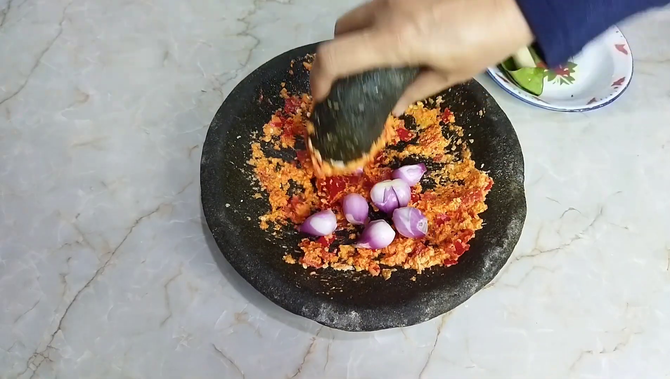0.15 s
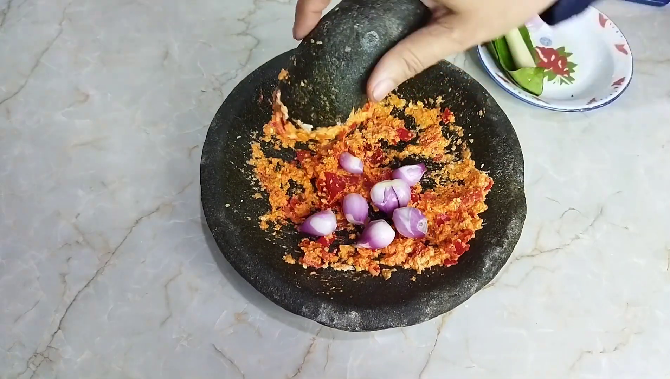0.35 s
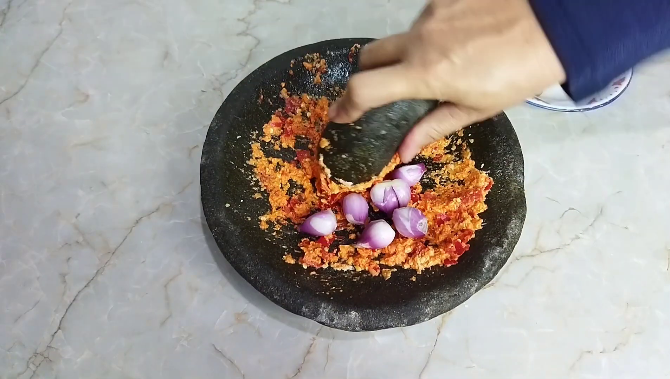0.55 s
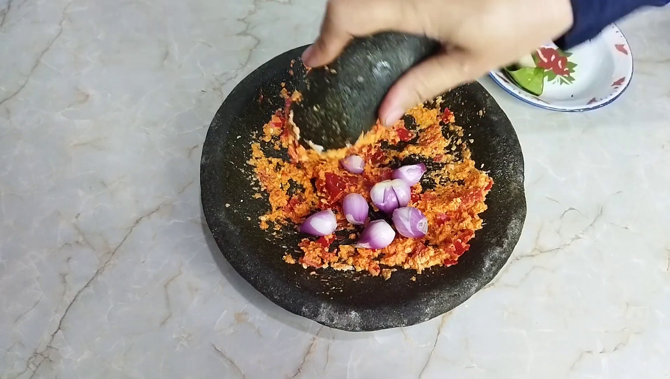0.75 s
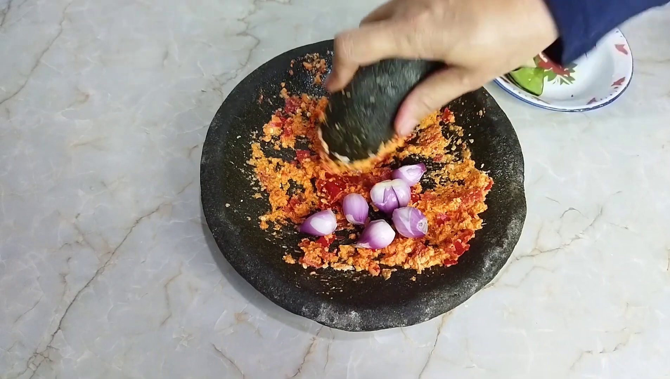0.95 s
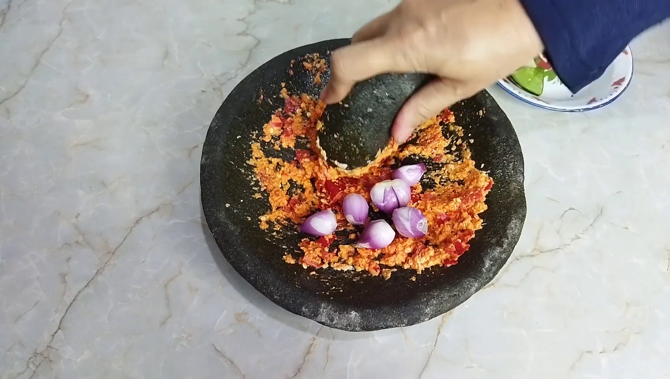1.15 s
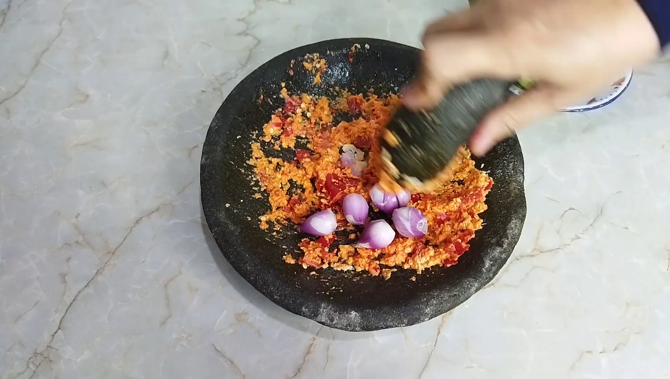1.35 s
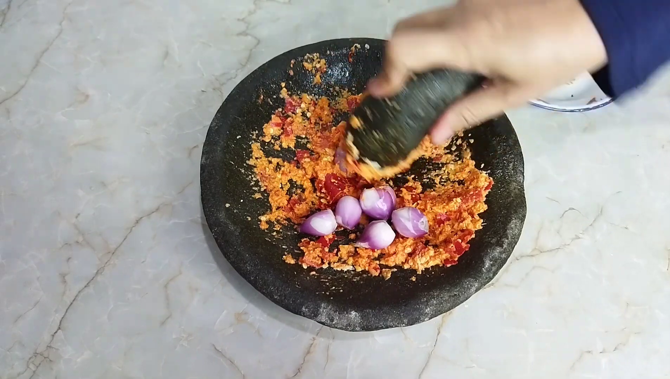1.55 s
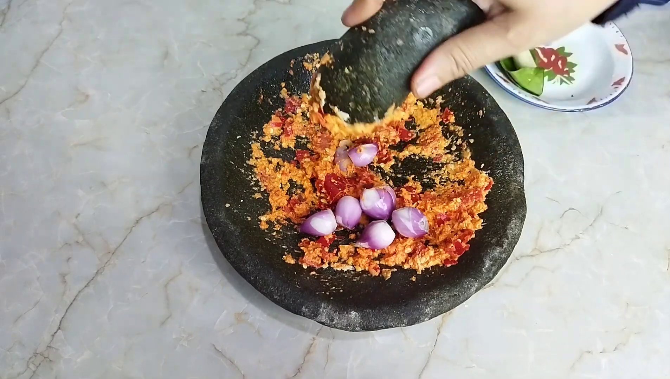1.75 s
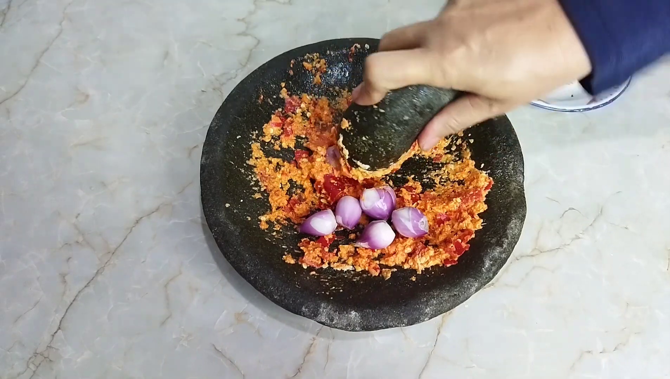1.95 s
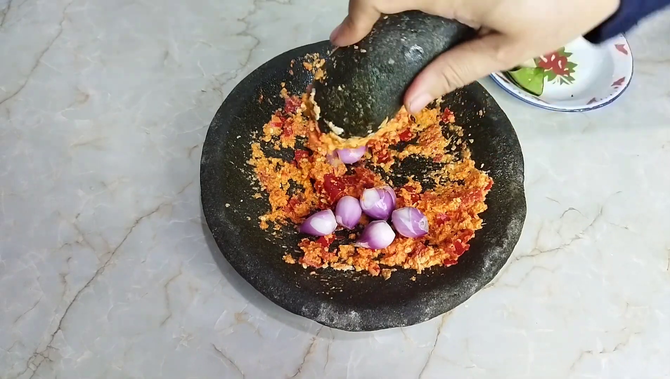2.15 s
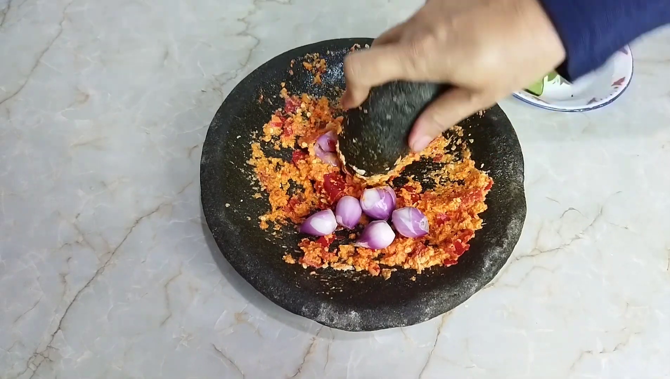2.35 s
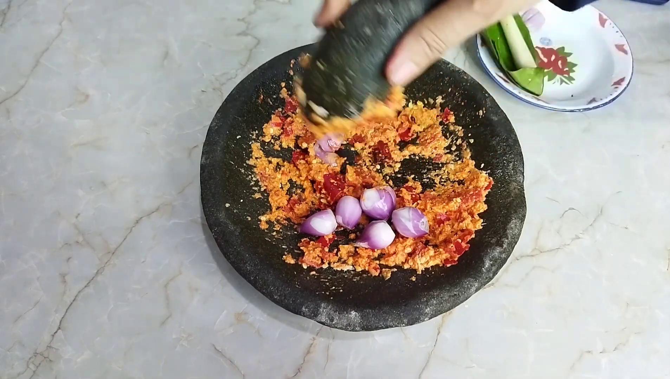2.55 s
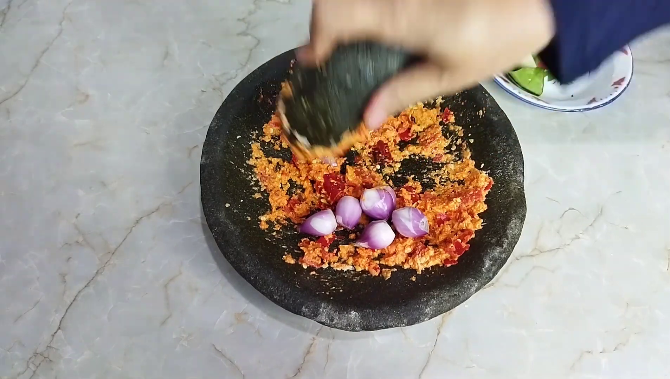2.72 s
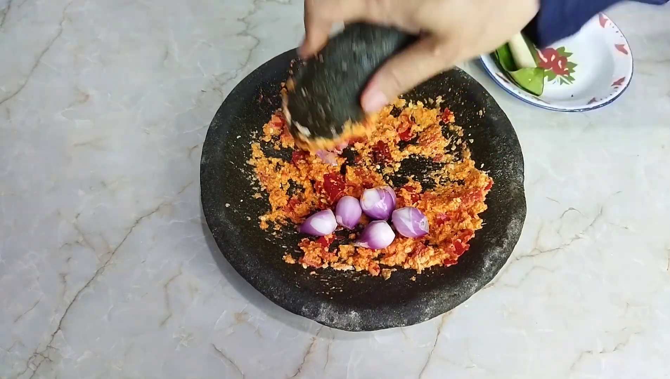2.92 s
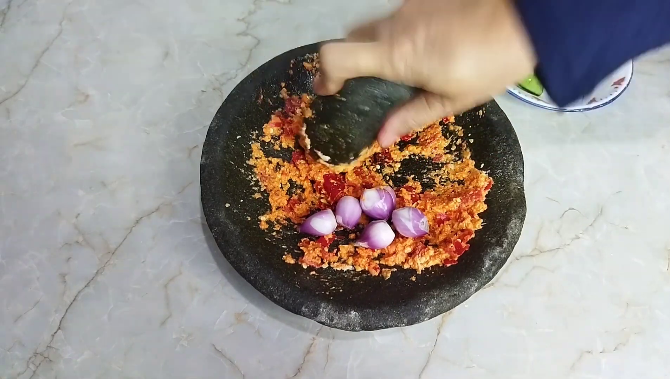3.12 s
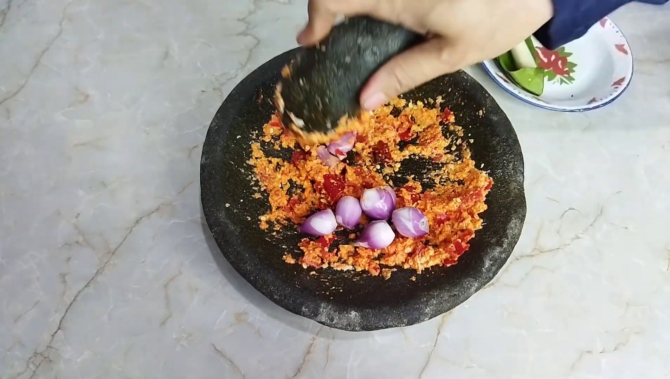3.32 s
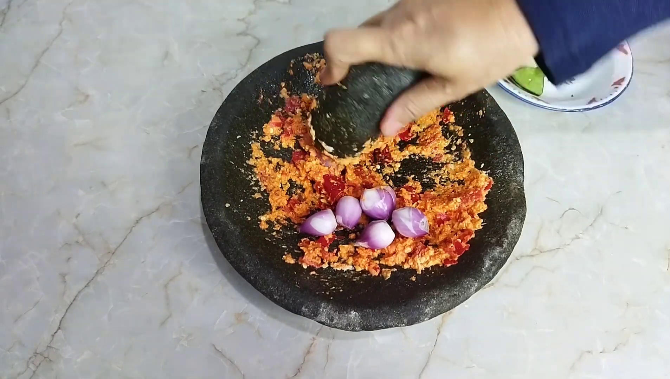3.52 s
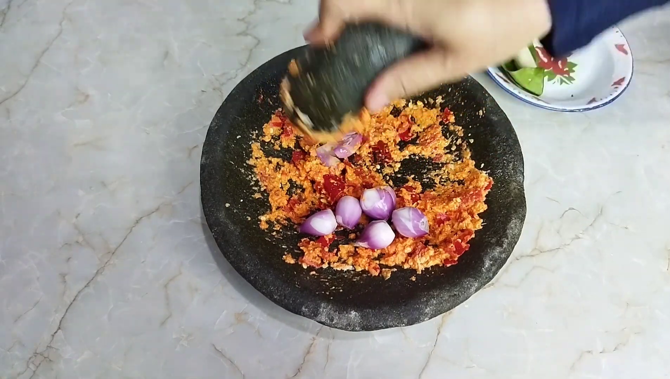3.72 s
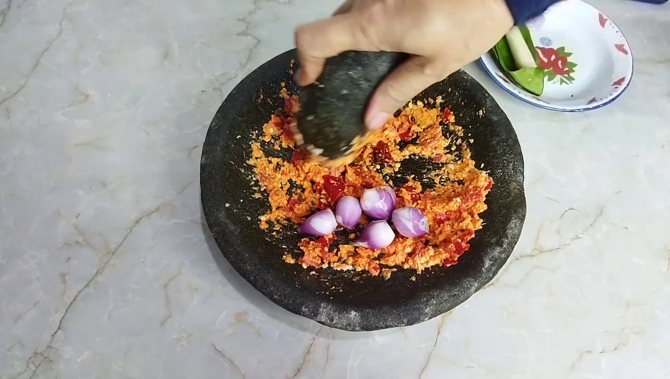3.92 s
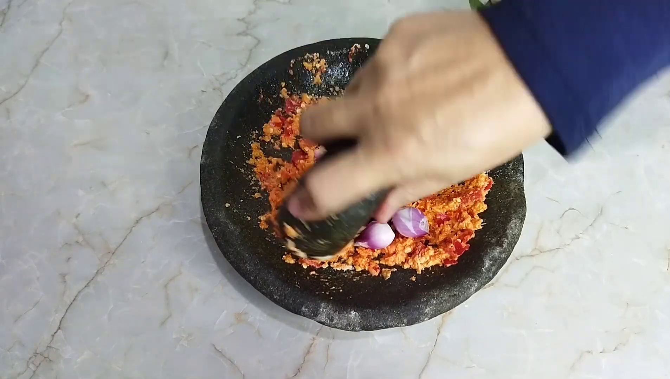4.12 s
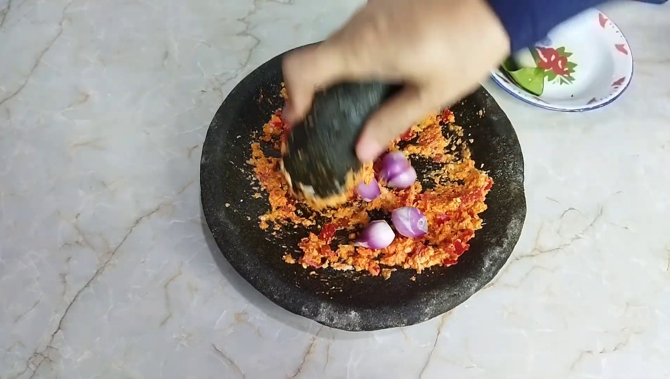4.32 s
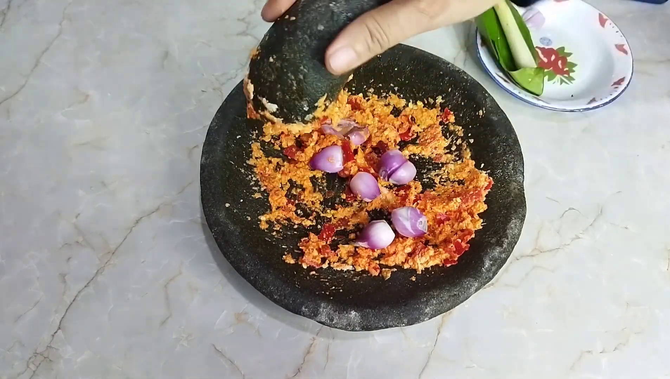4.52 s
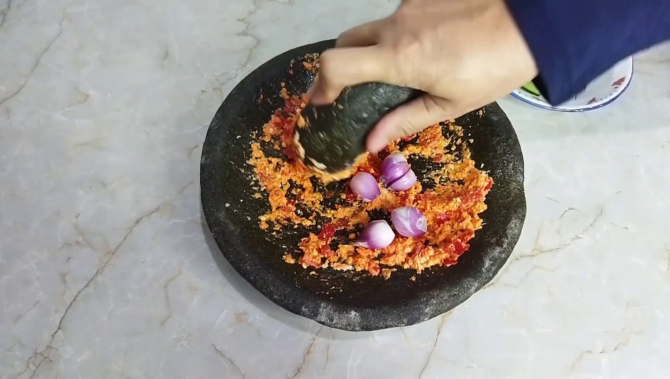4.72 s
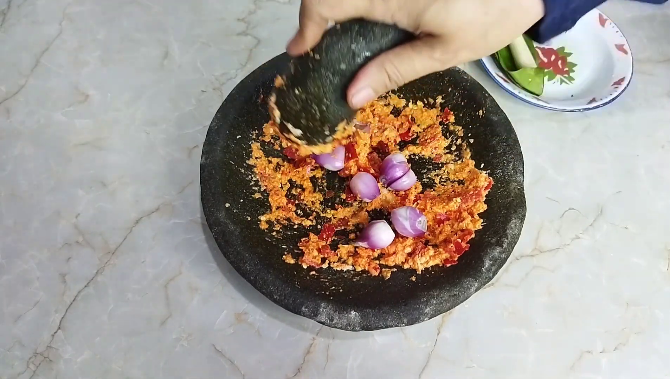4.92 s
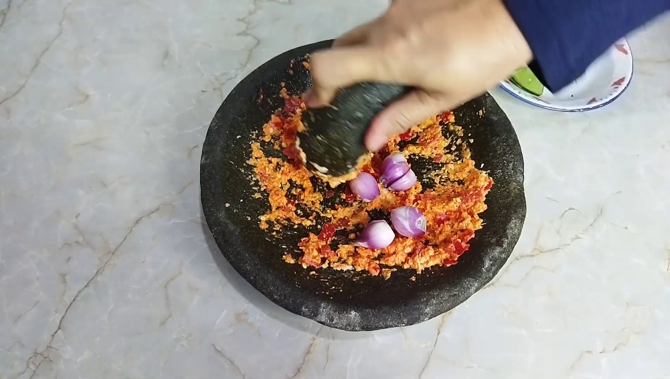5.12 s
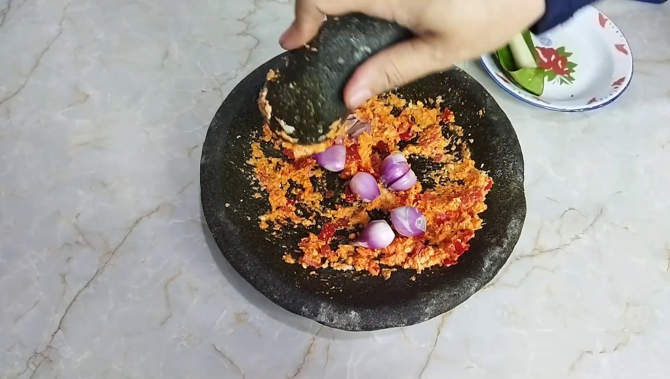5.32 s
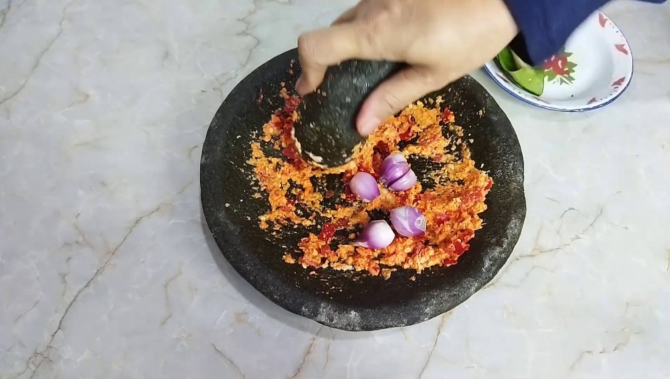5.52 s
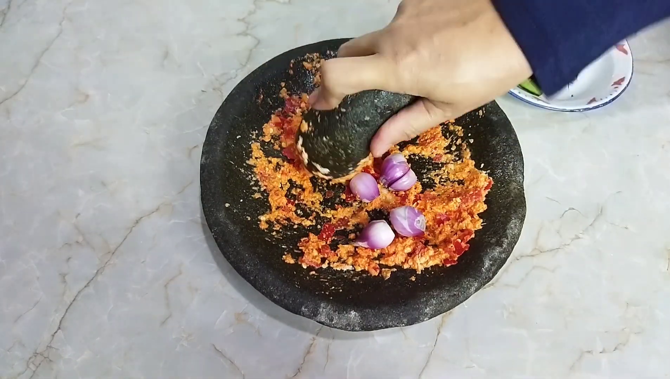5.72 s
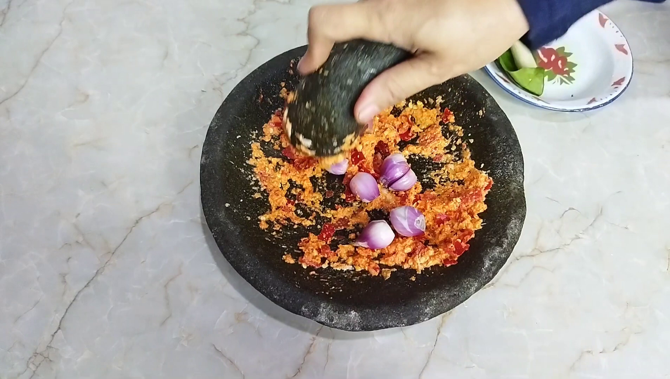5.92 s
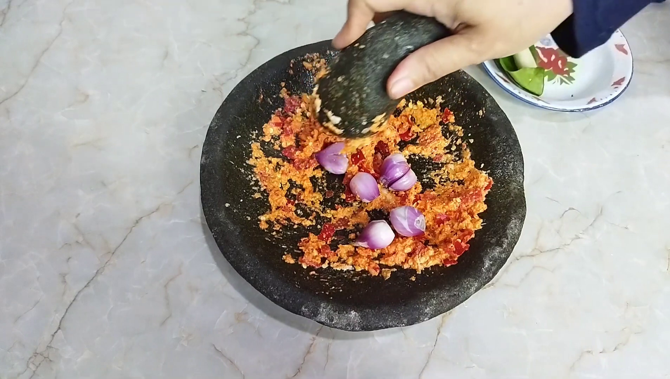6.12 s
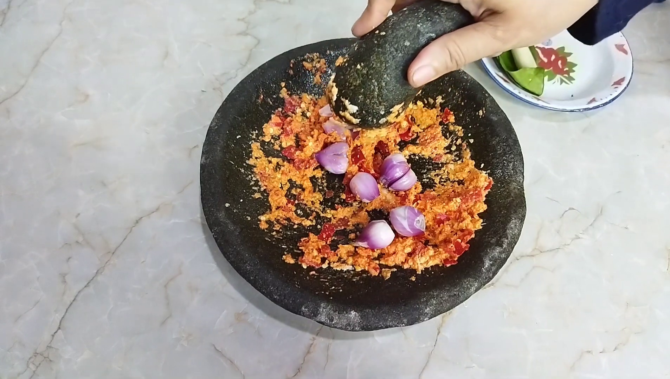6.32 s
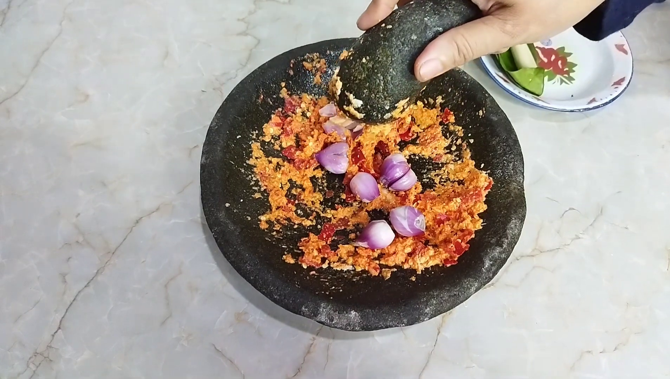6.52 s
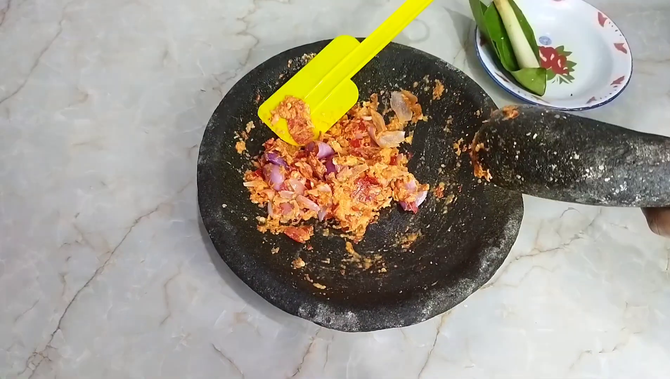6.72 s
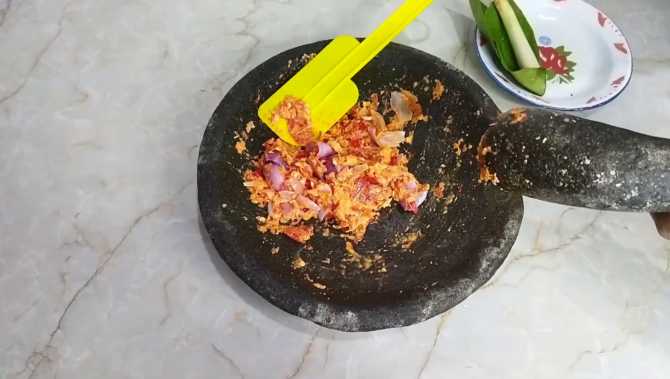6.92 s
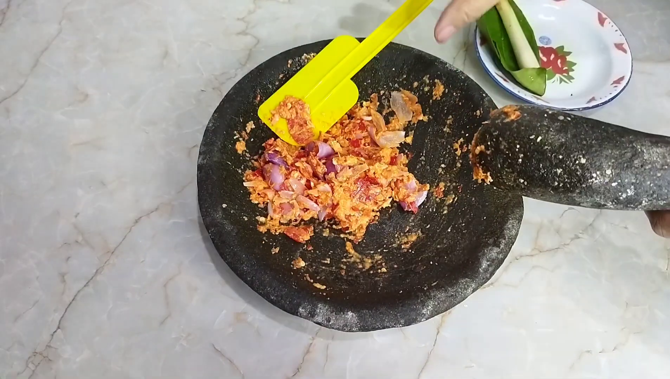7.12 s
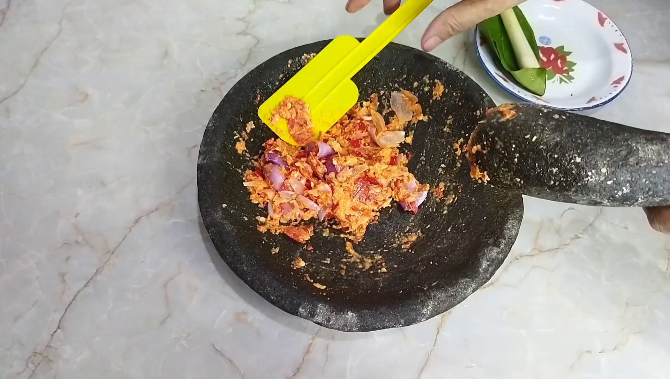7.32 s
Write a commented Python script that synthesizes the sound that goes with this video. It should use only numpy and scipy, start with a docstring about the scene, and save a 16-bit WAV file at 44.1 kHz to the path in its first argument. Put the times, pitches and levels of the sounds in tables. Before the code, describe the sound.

Uneven thuds of a stone pestle crushing shallots in a mortar, each with a bright crackle, over low microphone rumbles and faint hiss.

```python
"""A gust of air rumbles and hisses on the microphone. Then a stone pestle pounds shallots in a stone mortar on
a kitchen floor: a short bright crackle leads into each thud, and the room booms. At 2.4 s the pestle hits bare
stone and clinks, and an enamel plate rings; a rumble trails this blow and the one at 3.3 s. The pestle scrapes
three times, paste ticks and rustles, and more gusts pass. The last blow lands at 5.9 s, and from 6.7 s two thin
bands of hiss throb to the end. A faint hiss and hum lie under it all."""
import sys
import numpy as np
from scipy import signal
from scipy.fft import rfft, irfft, next_fast_len
from scipy.io import wavfile
from scipy.ndimage import uniform_filter1d

SR = 44100
rng = np.random.default_rng(int(sys.argv[2]) if len(sys.argv) > 2 else 0)


def put_to_file(sound):
    """Save the sound as 16-bit audio at rate SR, in the file named by the first command-line argument."""
    columns = np.atleast_2d(sound).T  # one column per channel
    safe = np.clip(columns, -1, 1)
    whole_steps = np.round(safe * 32767)
    wavfile.write(sys.argv[1], SR, whole_steps.astype(np.int16))


N = 328838

# pestle blows: start_s, thud_db, crackle_db, crackle_ms, crackle_pitch_hz, crackle_pan_db, squelch_db
# (a pan above 0 is louder on the left)
BLOWS = [(0.6829, -14.5, -14.5, 7.5, 2980, 5, -34.5), (1.003, -8, -12, 6.2, 3970, 3, -33.5),
         (1.266, -8.5, -13.5, 7.66, 4250, 4, -36), (2.0764, -21, -22, 7.8, 4300, 5, -43),
         (2.4391, -11, -10, 2.5, 4250, 7.5, -36.5), (2.9348, -16, -21.5, 6.8, 4380, 6.5, -41),
         (3.2972, -11, -10.5, 6.4, 4460, -2, -27.5), (3.628, -8, -11.5, 7.7, 4030, 0.5, -32.5),
         (3.9446, -7, -13, 6.7, 4580, 1, -32), (4.89, -16.5, -24.5, 12, 4340, 4, -43.5),
         (5.2319, -10.5, -10, 6, 4500, 5, -33), (5.5675, -8, -10.5, 7.8, 2860, 4.5, -35),
         (5.873, -6.5, -14.5, 5.6, 4300, 4.5, -36.5)]
# the bowl's short knock: pitch_hz, level_db, fade_s (a fade is the time to fall by 60 dB)
KNOCK_TONES = [(660, -2, 0.022), (916, -2, 0.0043)]
# the longer ring of bowl and floor slab: pitch_hz, level_db, fade_s
BOWL_TONES = [(414, -28.5, 0.05), (456, -5.5, 0.25), (554, -13, 0.061), (591, -26.5, 0.09),
              (650, 11.5, 0.036), (660, -13, 0.36), (693, -6, 0.31), (693, -18, 0.22), (782, -14.5, 0.37),
              (920, -28, 0.032), (959, -26, 0.1)]
# the room's own low notes: pitch_hz, level_db, fade_s, delay_ms, rise_ms
BOOM_TONES = [(90, -9.5, 0.26, 1.4, 4.8), (97.4, -0.5, 0.17, 4.26, 2.5), (110.2, -1, 0.31, 5.47, 2.2),
              (118.4, -12.5, 0.87, 4.64, 5.), (154.4, 2, 0.12, 4.86, 4.7), (168.5, -5, 0.51, 7.95, 13),
              (181.7, 1, 0.33, 4.13, 3.8), (220.8, -6, 0.29, 6.42, 4), (244, -1.5, 0.033, 7.4, 2.2),
              (238, -4.5, 0.29, 5.6, 2.3), (309.3, -4, 0.26, 4.77, 2.4), (387.7, -9, 0.21, 5.4, 4.4)]
# tone colour of the crackle and squelch: pitch_hz, level_db
CRACKLE_COLOUR = [(700, -4), (1300, -13.5), (2500, -3.5), (4200, -4), (6500, -5), (8300, -7.5),
                  (10000, -3.5), (11500, -16.5), (13000, -31.5)]
# hits on bare stone that set a plate ringing: start_s, click_db, ring_db
CLINKS = [(2.4394, -5.5, -13.5)]
# the hard click of such a hit: pitch_hz, level_db, fade_s
CLICK_TONES = [(1500, 14, 0.0082), (2270, 8, 0.0045), (3600, -4, 0.0018), (6330, -10, .002)]
# an enamel plate ringing, with close pairs that beat: pitch_hz, level_db, fade_s
CLINK_TONES = [(4327, -8, 0.38), (4255, 5, .07), (4450, 0, .06), (4270, -10, .25), (4372, -12, 0.28),
               (4530, -11, 0.14), (2480, -10, 0.37), (2440, 0, 0.065), (2640, -8, .1), (2130, -7, 0.07),
               (1910, -2, 0.072), (1560, -5, 0.12), (3060, -13, .2), (3490, -10, 0.14)]
# small ticks of paste and stone: start_s, level_db, pitch_hz, pan_db
TICKS = [(0.026, -34, 910, -0.5), (1.144, -29.5, 1160, -0.5), (1.527, -29.5, 1200, 0),
         (1.571, -43, 5240, 11), (3.5, -32.5, 1146, -0.5), (4.253, -57, 1230, -3), (4.309, -58, 1440, 1.0),
         (4.912, -27, 850, 0.5)]
# drags of the pestle: start_s, length_s, level_db, start_pitch_factor, end_pitch_factor
SCRAPES = [(3.292, .17, -54.5, 1.0, 1.06), (4.815, 0.39, -51.5, 0.986, 1.02), (5.23, .13, -58, 1.05, 0.95)]
# stone singing under a drag: pitch_hz, width_hz, level_db
SCRAPE_BANDS = [(2580, 300, -9), (3460, 250, -7), (4130, 140, 0.5), (4530, 200, 0), (5150, 300, -5),
                (6260, 500, -5), (10200, 600, -7.5)]
# soft puffs of hiss (wind in the first gust, later rustles of paste and sleeve):
# start_s, length_s, level_db, pitch_hz, width_hz
PUFFS = [(0.159, 0.31, -60, 3240, 4000), (1.564, 0.037, -55.5, 5000, 6000), (1.64, 0.049, -55, 6750, 6000),
         (3.492, 0.25, -65, 1500, 2000), (3.717, 0.19, -58, 3730, 5000), (4.319, 0.14, -55.5, 4600, 5230),
         (4.797, 0.43, -54.5, 3500, 3600), (4.9, 0.26, -62, 10000, 2000), (6.079, 0.062, -56.5, 4255, 5000)]
# first echoes of the knock: delay_ms, left_db, right_db
ECHOES = [(6.023, -18, 0), (12.87, -9, -5.5), (20.13, -16, -29.5), (23.61, 0, -14)]
# how long sound lingers in the kitchen: pitch_hz, fade_s
KITCHEN_FADES = [(300, 0.39), (790, 0.24), (2090, 0.46), (5510, 0.15)]
# low rumbles (gusts on the microphone, and the rumble trailing the blows at 2.4 s and 3.3 s):
# peak_s, level_db, swell_db_per_s, drop_s (time to fall by RUMBLE_DROP_DB)
RUMBLES = [(.3, -21, 35.5, 0.44), (2.49, -34.5, 90, 0.27), (2.9, -24, 40.5, 0.19), (3.53, -38.5, 28, 1.02),
           (5.8, -30.5, 42, 0.48), (6.1, -39, 30, 0.36)]
# tone colour of a weak rumble: pitch_hz, level_db
CALM_COLOUR = [(12, -39), (20, -0.5), (109, 1.5), (154, -9.5), (290, -15.5), (401, -28.5), (447, -32.5),
               (1500, -38), (1950, -44), (3300, -120)]
# tone colour of a strong rumble: pitch_hz, level_db
STRONG_COLOUR = [(12, -28), (20, -95), (38, 1), (103, -0.5), (281, -11), (436, -21.5), (474, -22.5),
                 (1120, -46), (1670, -53), (3000, -57.5), (3900, -78), (6600, -120)]
# path of the lower band of thin hiss: time_s, pitch_hz
LOW_HISS_PATH = [(6.66, 3800), (6.85, 3640), (6.92, 3760), (7.2, 3820), (7.32, 3560), (7.46, 3530)]
# fainter bands beside the thin hiss: pitch_hz, width_hz, level_db
FAINT_BANDS = [(3080, 730, -67), (5600, 140, -75), (6770, 250, -76.5), (9000, 250, -74.5)]
# tone colour of the room and microphone hiss: pitch_hz, level_db
HUSH_COLOUR = [(180, -15), (300, -1), (314, -13), (416, -10), (487, -7), (605, -12.5), (665, -9),
               (789, -17), (2010, -19), (2750, -25.5), (6290, -29), (8200, -32), (10900, -19.5),
               (11600, -25), (12500, -82), (16200, -89), (22000, -120)]
# stereo spread of that hiss: pitch_hz, spread_db (lower means left and right are more alike)
HUSH_SPREAD = [(60, -48), (110, 0), (200, -19), (350, -12.5), (630, -10), (1140, -2), (2060, -2.5),
               (3720, -4), (6700, -1), (12100, -0.5)]
# wavering low hum: pitch_hz, width_hz, level_db
HUM_BANDS = [(70.2, 7.1, -52), (288.2, 16.3, -61.5)]
# how strongly the microphone hears each pitch: pitch_hz, gain_db
MICROPHONE = [(20, 0), (40, -4), (70, -1), (9000, 1.5), (11000, 0), (11800, -6.5), (12600, -16)]

CRACKLE_WIDTH_HZ, CRACKLE_ACCENT, SQUELCH_ACCENT, SQUELCH_FADE_S = 1160, 0.34, 0.12, 0.18
BOOM_DB, BOOM_PER_THUD_DB = -13, 0.8057  # the boom grows more slowly than the thud
CALM_DB, WANDER_DB, RUMBLE_DROP_DB = -44, 1, 21
HISS_START_S, THROBS_PER_S, THROB_DB, HISS_FADE_DB_PER_S = 6.664, 7.9, 6, 2
LOW_HISS_DB, HIGH_HISS_DB, HIGH_HISS_HZ = -57, -59.5, 4590
HUSH_DB, TREBLE_LIMIT_HZ = -55.5, 12700


def pestle_blows(grains):
    """Each blow knocks the bowl, sets it ringing and makes the room boom; returns these three tracks."""
    knocks, bowls, booms = np.zeros((3, N))
    cushion = signal.windows.hann(round(0.00057 * SR))  # paste softens the blow
    knock = -signal.oaconvolve(rings(KNOCK_TONES, .05), cushion / cushion.sum())
    knock = cut_bass(knock, 250)  # a small bowl gives off no deep bass
    rise = 1 - np.exp(-np.arange(SR // 2) / SR / 0.00042)  # the slab takes a moment to start ringing
    boom = room_boom()
    for (s, db, *_), (_, _, grit) in zip(BLOWS, grains):
        # each blow lands on a new spot, which changes the mix of tones
        tones = [(hz, level + 2.3 * luck, fade) for (hz, level, fade), luck in zip(BOWL_TONES, grit)]
        add(knocks, s, amp(db) * knock)
        add(bowls, s, -amp(db - 4.5) * rings(tones) * rise)
        add(booms, s, amp(BOOM_DB + BOOM_PER_THUD_DB * db) * boom)
    return knocks, bowls, booms


def crackle(hz, length_ms, grains):
    """A quick run of bright snaps that swells and fades."""
    n = round(length_ms * SR / 1000)
    swell = np.sin(np.pi * np.arange(n) / n) ** 1.07
    snaps = grains[:n] * abs(grains[-n:]) * swell
    x = crackle_colour(np.pad(snaps, (0, 200)), hz, CRACKLE_ACCENT)
    return x / abs(x).max()


def crackles_and_squelches(grains):
    """A short bright crackle leads into each thud, then the wet paste squelches and dies away."""
    out, t = np.zeros((2, N)), np.arange(grains.shape[-1]) / SR
    for (s, _, crackle_db, length_ms, hz, pan_db, squelch_db), (one, two, grit) in zip(BLOWS, grains):
        snaps = panned(crackle(hz, length_ms, one), pan_db)
        # the left side hears the snaps from another angle
        snaps[0] = 0.4 * snaps[0] + 0.79 * amp(pan_db / 2) * crackle(hz, length_ms, two)
        add(out, s + .0006 - length_ms / 1000, amp(crackle_db) * snaps)
        spitting = (0.43 + grit ** 2) * amp(1.2 * wobble(grit, 60))
        squelch = [crackle_colour(x * spitting, hz, SQUELCH_ACCENT) for x in (one, two)]
        add(out, s, amp(squelch_db - 60 * t / SQUELCH_FADE_S) * amp([[1.2], [-1.2]]) * squelch)
    return out


def crackle_colour(x, hz, accent):
    """Gives noise a bright, crisp tone; accent sets how much the band at hz stands out."""
    pitches = np.fft.rfftfreq(len(x), 1 / SR)
    broad = evened(irfft(rfft(x) * amp(look_up(CRACKLE_COLOUR, pitches)), len(x)))
    return evened(broad + accent * band(x, hz, CRACKLE_WIDTH_HZ))


def clinks():
    """Stone meets bare stone: a hard click, then an enamel plate rings with a rough waver."""
    out = np.zeros((2, N))
    for s, click_db, ring_db in CLINKS:
        waver = amp(4.8 * wobble(rng.standard_normal(SR // 2), 150))
        add(out, s, amp(click_db) * panned(rings(CLICK_TONES, .02), 0.55))
        add(out, s, amp(ring_db) * panned(rings(CLINK_TONES) * waver, 0.77, lag_ms=.05))
    return out


def ticks():
    """Paste and stone give small ticks, each made of three very short tones."""
    out = np.zeros((2, N))
    for s, db, hz, pan_db in TICKS:
        tones = [(hz, 0, .014), (1.35 * hz, -8, .006), (2.77 * hz, -6, .008)]
        add(out, s, amp(db) * panned(rings(tones, .03), pan_db))
    return out


def scrapes():
    """Grit slips in uneven clicks that ring the stone; the pitch drifts along the drag."""
    out = np.zeros((2, N))
    for s, length_s, db, start, end in SCRAPES:
        draw, n = np.random.default_rng(rng.integers(2 ** 31)), round(length_s * SR)
        slips = draw.standard_normal((2, n)) * (draw.random(n) < 5000 / SR)  # about 5000 a second
        drift = np.linspace(start, end, n)
        bands = [(hz * drift, width, level + 2.5 * wobble(draw.standard_normal(n), 1800))
                 for hz, width, level in SCRAPE_BANDS]  # each band comes and goes
        singing = [evened(mix_bands(x, bands)) for x in slips]
        add(out, s, amp(db) * amp([[1.5], [-1.5]]) * singing * signal.windows.tukey(n, .35))
    return out


def puffs():
    """Soft, grainy puffs of hiss: wind in the first gust, later rustles of paste and sleeve."""
    out = np.zeros((2, N))
    for s, length_s, db, hz, width in PUFFS:
        draw, n = np.random.default_rng(rng.integers(2 ** 31)), round(length_s * SR)
        left, right, grit = draw.standard_normal((3, n))
        puff = [band(x * (1 + .5 * abs(grit)), hz, width) for x in (left, right)]
        swell = np.sin(np.linspace(0, np.pi, n)) ** 0.48
        add(out, s, amp(db) * amp([[1.5], [-1.5]]) * puff * swell)
    return out


def room_boom():
    """The room's low notes swell and die after a blow, starting with a dip in air pressure."""
    out, t = np.zeros(SR), np.arange(SR // 2) / SR
    for hz, db, fade_s, delay_ms, rise_ms in BOOM_TONES:
        rise = 1 - np.exp(-t * 1000 / rise_ms)
        add(out, delay_ms / 1000, -amp(db - 60 * t / fade_s) * rise * np.sin(2 * np.pi * hz * t))
    out = cut_bass(out, 55)  # the room holds nothing deeper
    return out / out[:SR // 20].std()


def kitchen_echo(x):
    """Many tiny echoes blur into a tail in which each pitch dies at its own speed."""
    taps = np.zeros((2, SR // 2))
    slots = np.arange(200, SR // 2 - 20, 20)
    arrivals = slots + rng.integers(0, 20, (2, len(slots)))
    np.put_along_axis(taps, arrivals, rng.choice([-1., 1.], arrivals.shape), 1)
    hz, t, spectra = signal.stft(taps, SR, nperseg=256)
    shared = np.clip(1 - hz / 1500, 0, 1)[:, None]  # long waves reach both sides alike
    spectra[1] = shared * spectra[0] + np.sqrt(1 - shared ** 2) * spectra[1]
    fade = amp(-60 * t / look_up(KITCHEN_FADES, hz)[:, None])
    tail = signal.istft(spectra * fade, SR, nperseg=256)[1]
    return signal.fftconvolve(x, tail / np.linalg.norm(tail[0]), axes=1)[:, :N]


def rumbles():
    """Gusts on the microphone and the tails of two blows: a lumpy rumble, brighter when louder."""
    def colour_db(hz, t):
        strength = np.clip((rumble_db(t) + 46.5) / 18, 0, 1)
        return (1 - strength) * look_up(CALM_COLOUR, hz) + strength * look_up(STRONG_COLOUR, hz)
    rumble = shaped_noise(colour_db, 2048)
    rumble /= np.sqrt(smooth(rumble ** 2, 9000))  # flatten the level before shaping it
    lumps, wander = (wobble(rng.standard_normal(N), n) for n in (500, 6000))
    return rumble * amp(rumble_db(np.arange(N) / SR) + 1.44 * lumps + WANDER_DB * wander)


def rumble_db(t):
    """Each rumble swells steadily, then drops ever faster, over a weak draught."""
    levels = [db + np.where(t < s, swell * (t - s), -RUMBLE_DROP_DB * ((t - s) / drop_s) ** 2)
              for s, db, swell, drop_s in RUMBLES]
    return 10 * np.log10(amp(CALM_DB) ** 2 + (amp(levels) ** 2).sum(0))


def thin_hiss():
    """Two narrow bands of noise jump up and sink again and again, with fainter ones beside them."""
    t = np.arange(HISS_START_S, N / SR, 1 / SR)
    age_s = t - HISS_START_S
    throb_db = uniform_filter1d(-THROB_DB * (age_s * THROBS_PER_S % 1), 400) - HISS_FADE_DB_PER_S * age_s
    low_hz = np.interp(t, *np.transpose(LOW_HISS_PATH))
    bands = [(low_hz, 210, LOW_HISS_DB + throb_db), (HIGH_HISS_HZ, 260, HIGH_HISS_DB + throb_db)]
    hiss = [mix_bands(x, bands + FAINT_BANDS) for x in rng.standard_normal((2, len(t)))]
    flutter = amp(0.79 * wobble(rng.standard_normal(len(t)), 250))
    out = np.zeros((2, N))
    add(out, HISS_START_S, amp(1.5) * flutter * hiss * np.minimum(age_s / 0.0054, 1))
    return out


def hush():
    """The room and microphone hiss steadily, wide in the treble, over a faint hum."""
    middle = shaped_noise(lambda hz, t: look_up(HUSH_COLOUR, hz), 1024)
    side = shaped_noise(lambda hz, t: look_up(HUSH_COLOUR, hz) + look_up(HUSH_SPREAD, hz), 1024)
    hum = mix_bands(rng.standard_normal(N), HUM_BANDS)
    return amp(HUSH_DB) * np.array([middle + side, middle - side]) / middle.std() + hum


def rings(tones, length_s=.5):
    """A struck object rings as a sum of dying sine waves, scaled here to a peak of 1."""
    t = np.arange(round(length_s * SR)) / SR
    x = sum(amp(db - 60 * t / fade_s) * np.sin(2 * np.pi * hz * t) for hz, db, fade_s in tones)
    return x / abs(x).max()


def band(x, hz, width_hz):
    """Keeps the sound near hz: shift that pitch down to zero, smooth, shift back, and repeat."""
    turn = np.exp(2j * np.pi * np.cumsum(hz * np.ones(len(x))) / SR)
    memory = np.exp(-np.pi * width_hz / SR)
    for _ in range(2):
        x = 2 * (turn * signal.lfilter([1 - memory], [1, -memory], x * turn.conj())).real
    return evened(x)


def mix_bands(x, bands):
    """Adds up several bands of x, each at its own level."""
    return sum(amp(db) * band(x, hz, width) for hz, width, db in bands)


def shaped_noise(colour_db, size, patchy_db=2.0):
    """Noise that follows colour_db(hz, t), with random louder and softer patches."""
    hz = np.fft.rfftfreq(size, 1 / SR)[:, None]
    t = np.arange(N * 4 // size + 5) * size / 4 / SR
    real, imag, patches = rng.standard_normal((len(t), len(hz), 3)).T
    patches = evened(uniform_filter1d(uniform_filter1d(patches, 6, axis=0), 14, axis=1))
    spectra = (real + 1j * imag) * amp(colour_db(hz, t) + patchy_db * patches)
    return signal.istft(spectra, nperseg=size, noverlap=size * 3 // 4)[1][:N]


def panned(x, pan_db, lag_ms=.08):
    """Makes stereo: the left is pan_db louder and the right comes slightly late."""
    return np.array([x, np.roll(x, round(lag_ms * SR / 1000))]) * amp([[pan_db / 2], [-pan_db / 2]])


def add(mix, start_s, sound):
    part = mix[..., max(round(start_s * SR), 0):][..., :sound.shape[-1]]
    part += sound[..., :part.shape[-1]]


def look_up(table, hz):
    """Reads between a table's rows, with pitch spaced by octaves."""
    pitches, values = np.transpose(table)
    return np.interp(np.log(hz + 1), np.log(pitches + 1), values)


def cut_bass(x, hz):
    return signal.lfilter(*signal.butter(2, hz, "high", fs=SR), x)


def smooth(x, size):
    return uniform_filter1d(uniform_filter1d(x, size), size)


def wobble(x, size):
    """Smooths noise into a slow random drift."""
    return evened(smooth(x, size))


def evened(x):
    """Scales x to an average strength (rms) of 1."""
    return x / np.sqrt(np.mean(x ** 2) + 1e-20)


def amp(db):
    """Turns decibels into a volume factor."""
    return 10 ** (np.asarray(db) / 20)


def scene():
    """Mixes the pounding, its echoes and the background in stereo."""
    grains = rng.standard_normal((len(BLOWS), 3, 8000))  # three strips of noise for each blow
    knocks, bowls, booms = pestle_blows(grains)
    sharp = crackles_and_squelches(grains) + clinks() + ticks()
    mortar = panned(knocks + bowls, 2.8, lag_ms=.09)
    for delay_ms, left_db, right_db in ECHOES:
        add(mortar, delay_ms / 1000, knocks * amp([[left_db], [right_db]]))
    room = kitchen_echo(amp(-2.0) * knocks + amp(-11.5) * sharp + amp(-16.0) * booms)
    room += panned(booms, 1.0, lag_ms=.13)
    return mortar + sharp + room + puffs() + scrapes() + rumbles() + hush() + thin_hiss()


def record(dry):
    """The microphone colours the sound, and the highest treble is cut off."""
    size = next_fast_len(N)
    gain = amp(look_up(MICROPHONE, np.fft.rfftfreq(size, 1 / SR)))
    heard = irfft(rfft(dry, size) * gain, size)[:, :N]
    treble_cut = signal.firwin(511, TREBLE_LIMIT_HZ, window=("kaiser", 9), fs=SR)
    return signal.oaconvolve(heard, treble_cut[None], "same")


dry = scene()
out = record(dry)
put_to_file(out)
```